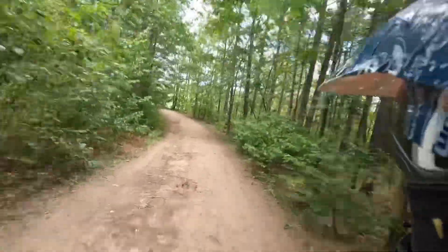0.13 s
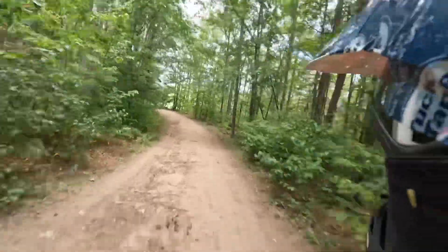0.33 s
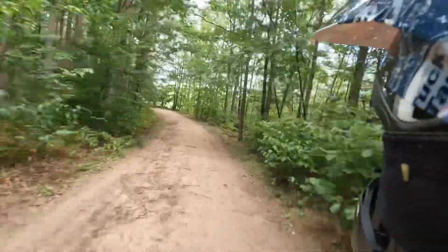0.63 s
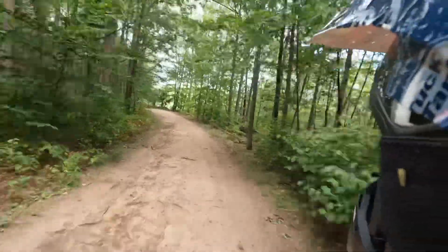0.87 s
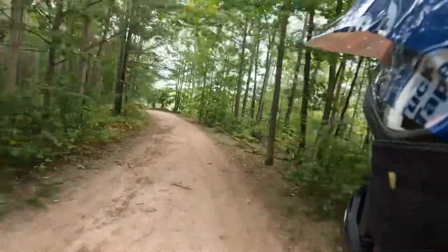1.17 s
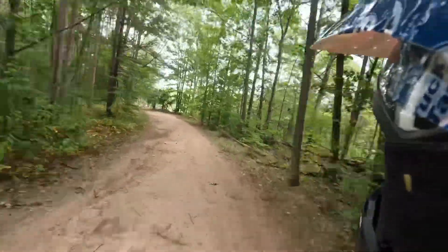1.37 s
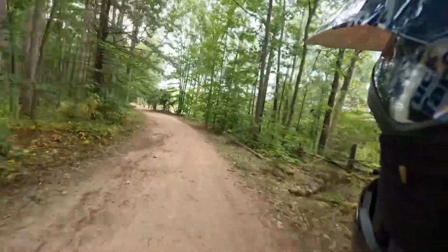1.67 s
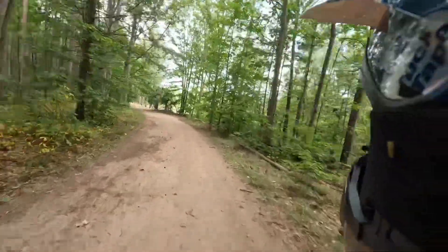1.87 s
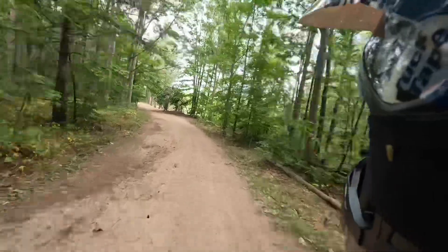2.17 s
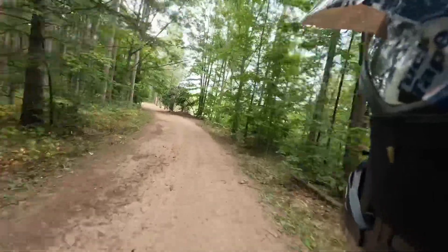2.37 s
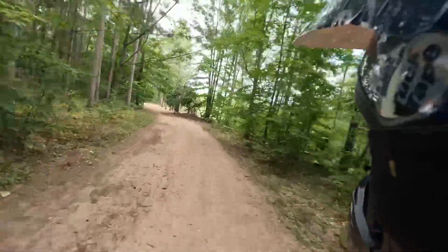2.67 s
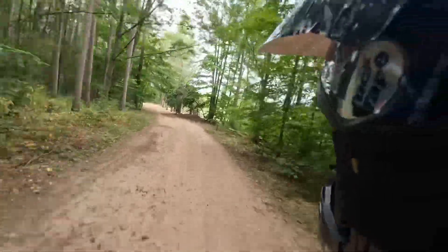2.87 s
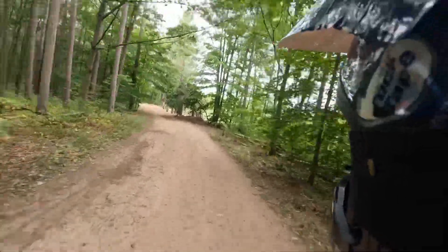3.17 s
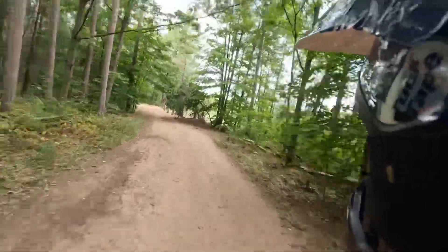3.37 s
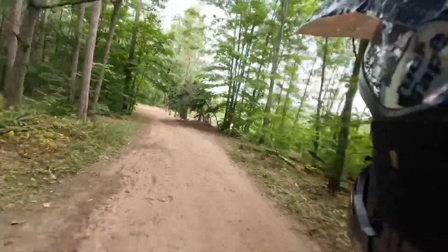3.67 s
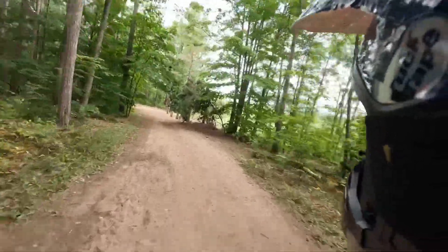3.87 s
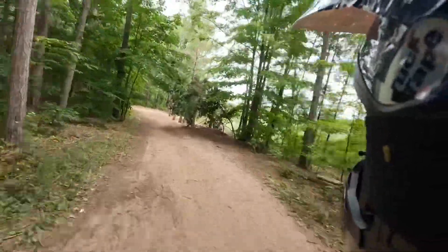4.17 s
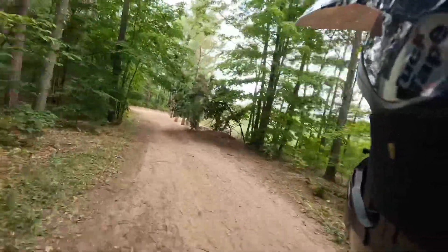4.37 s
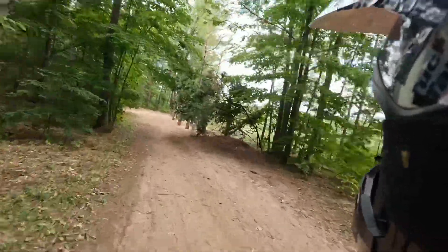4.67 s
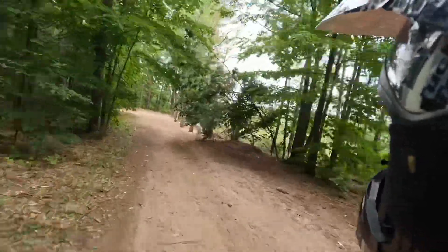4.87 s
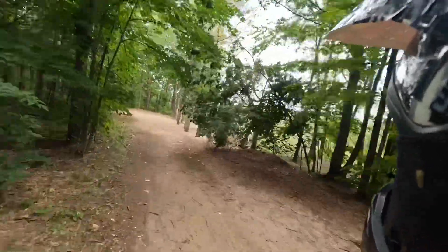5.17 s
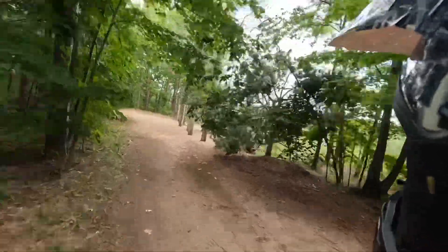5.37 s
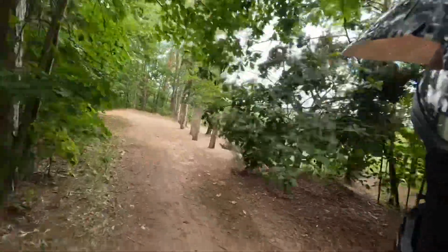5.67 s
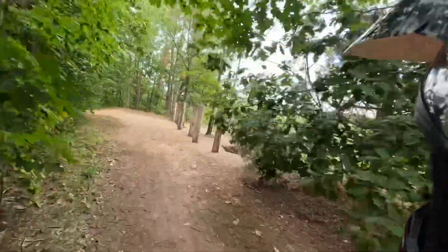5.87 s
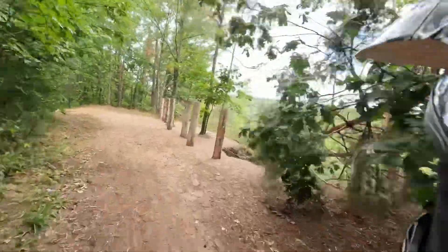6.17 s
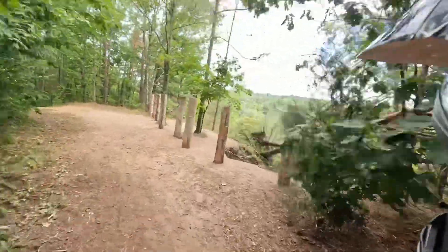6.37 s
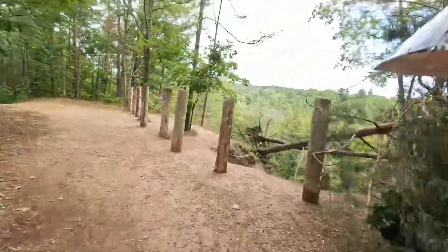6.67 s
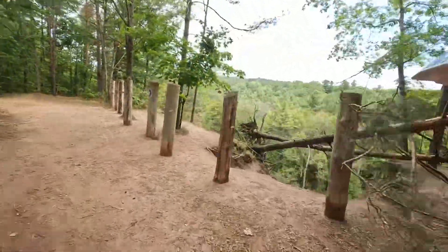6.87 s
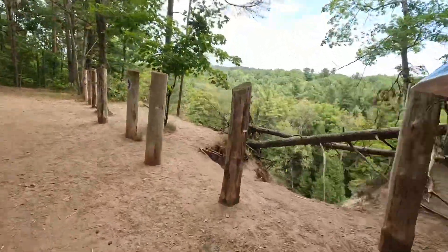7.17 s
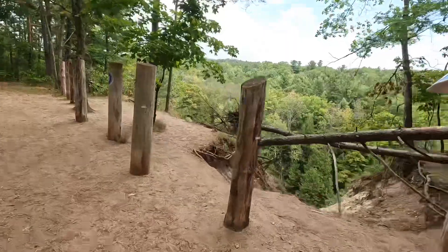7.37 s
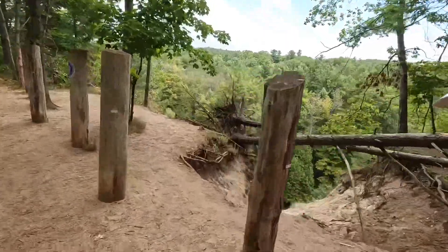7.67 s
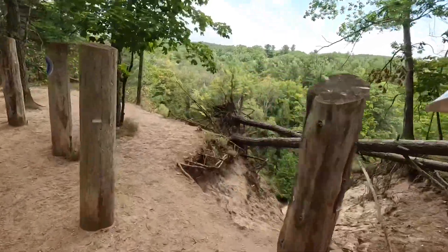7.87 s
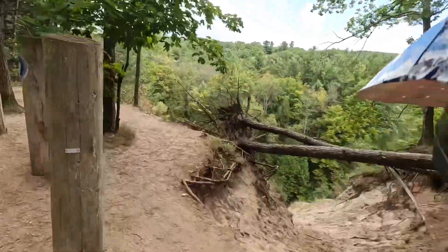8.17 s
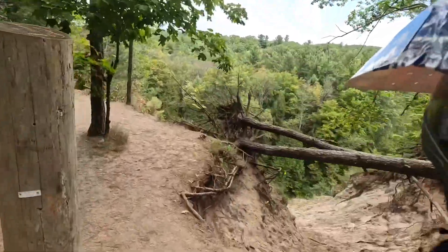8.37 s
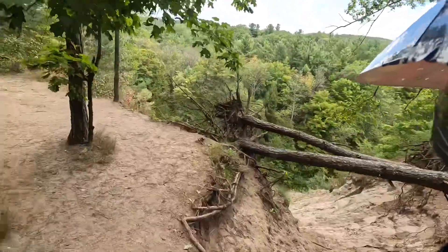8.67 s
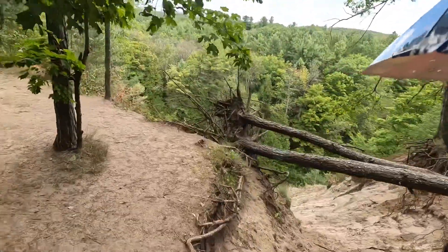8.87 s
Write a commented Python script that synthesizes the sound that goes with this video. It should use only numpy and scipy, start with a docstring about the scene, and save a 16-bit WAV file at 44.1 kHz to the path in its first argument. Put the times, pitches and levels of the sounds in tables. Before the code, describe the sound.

From the rider's shoulder, a little motorbike's buzzing engine slows from a brief rasp to a hollow, uneven putter, with metal clatter and tyre rumble.

```python
"""Dirt bike coasting to idle

A small two-stroke, heard from the rider's shoulder, shuts its throttle and coasts down a forest trail.
A crank clock with kicks and wander times the puffs that ring the silencer; strong firings add hollow pops
that end in a lumpy idle. Timed blows and shaped noise ring metal for clatter, slap and fizz.
Shaped noise also makes gear whine, chain hiss, tyre rumble and the air that buffets the microphone."""
import sys
import numpy as np
from scipy import signal
from scipy.io import wavfile
from scipy.ndimage import uniform_filter1d

SR = 44100
rng = np.random.default_rng(int(sys.argv[2]) if len(sys.argv) > 2 else 0)


def put_to_file(sound):
    """Save the sound as 16-bit audio at rate SR, in the file named by the first command-line argument."""
    columns = np.atleast_2d(sound).T  # one column per channel
    safe = np.clip(columns, -1, 1)
    whole_steps = np.round(safe * 32767)
    wavfile.write(sys.argv[1], SR, whole_steps.astype(np.int16))


N = 397782
T = np.arange(N) / SR

# mean crank speed, ahead of kicks and wander: t/s, speed/turns per second
MEAN_SPEED = [(0, 94.5), (.12, 87), (.26, 85.6), (.45, 78), (.66, 75.3), (.75, 76), (.92, 71.2),
              (1.06, 74.3), (1.19, 70.8), (1.28, 73.6), (1.37, 70.6), (1.46, 72.6), (1.64, 65.4),
              (1.86, 70.4), (1.99, 67), (2.17, 65.5), (2.38, 66.3), (2.48, 63.1), (2.58, 63.9),
              (2.78, 61.4), (2.9, 62.8), (3.02, 61.6), (3.17, 62.6), (3.38, 58.9), (3.75, 59.4), (3.95, 58),
              (4.15, 57.3), (4.3, 55.6), (4.55, 55.2), (4.9, 53), (5.12, 51.4), (5.36, 48.5), (6.2, 47.9),
              (6.6, 47.4), (7.25, 45.1), (7.9, 43.3), (8.15, 42.1), (8.5, 41.3), (8.85, 41.8), (9.02, 44)]
# bursts of strong firings: last pop t/s, its exhaust peak level/dB, firings in a row,
# metal knock level before smoothing/dB
BURSTS = [(1.415, -22, 1, -8), (3.63, -19, 1, -25), (3.834, -16.5, 1, 3), (3.953, -18, 1, -11),
          (4.094, -18, 1, -6), (4.233, -19.5, 1, 5.5), (4.362, -22, 1, -18), (4.502, -22, 1, -23),
          (4.661, -22, 2, -23), (4.791, -21.5, 1, -15), (4.904, -20.5, 1, -22), (5.056, -29, 2, -19),
          (5.233, -20, 1, -20), (5.398, -18, 1, 3), (5.563, -18, 1, -9), (5.583, -24.5, 1, 2),
          (5.769, -19.5, 2, -26), (5.914, -15.5, 1, 5), (6.1, -20, 3, -22), (6.286, -16.5, 1, -3),
          (6.451, -16.5, 1, 3), (6.58, -18.5, 1, -6), (6.643, -20.5, 2, -20), (6.792, -14.5, 1, 9),
          (6.94, -14.5, 1, 6), (7.093, -15, 1, 6), (7.241, -20, 4, -18), (7.33, -18.5, 1, -17),
          (7.374, -18.5, 1, -5), (7.421, -18, 1, -3), (7.487, -18.5, 2, -14), (7.601, -16.5, 1, -1),
          (7.736, -18, 1, -19), (7.827, -18.5, 1, -8), (7.897, -20.5, 2, -9), (8.011, -19, 1, -18),
          (8.082, -18.5, 1, -24), (8.153, -21.5, 1, -24), (8.246, -20.5, 1, -19), (8.342, -19.5, 1, -19),
          (8.461, -20, 2, -17), (8.58, -17.5, 1, -18), (8.653, -19.5, 2, -2), (8.7, -22, 1, -18),
          (8.867, -18, 1, 8.5), (8.912, -16, 1, 4)]
# weak exhaust puff of every turn, before scatter: t/s, level/dB
PUFF_LEVEL = [(0, -9.5), (.1, -22), (.14, -24), (.24, -25.5), (.35, -31.5), (.7, -36), (1, -33.5),
              (1.4, -31.5), (1.65, -30.5), (2, -23), (2.35, -27), (2.6, -25.5), (3.3, -27), (3.6, -24),
              (4.2, -26), (4.5, -30), (5.1, -26.5), (5.5, -29), (7, -25.5), (9.02, -28.5)]
# knocks in each turn: angle/share of a turn after the exhaust port opens, relative level/dB
KNOCK_ANGLES = [(.77, 0), (.97, -9), (.18, -9)]
# engine metal, before level trims: t/s, clatter level/dB, fizz level/dB
METAL_LEVEL = [(0, -34.5, -48), (.24, -40, -56), (.35, -46.5, -62.5), (.8, -47.5, -65), (1.2, -44, -59.5),
               (1.7, -45.5, -59.5), (2.5, -41, -58), (3, -44, -59), (4.15, -41.5, -54), (4.45, -45, -58),
               (5.2, -44, -59), (5.9, -43, -54.5), (7, -41, -55), (9.02, -42.5, -56.5)]
# rolling bike, before level trims: t/s, gear whine level/dB, chain hiss level/dB, tyre rumble level/dB
ROLLING_LEVEL = [(0, -57, -39, -28), (.3, -46, -43.5, -32.5), (.65, -47, -50, -32), (1.3, -53, -45, -30.5),
                 (2, -44.5, -43.5, -30.5), (2.8, -44, -45.5, -28.5), (3.4, -42, -44, -30),
                 (4.1, -35.5, -42.5, -33), (4.6, -41.5, -47.5, -36.5), (5.4, -38, -52.5, -37.5),
                 (5.9, -35.5, -48.5, -37), (6.2, -33.5, -52, -39), (6.7, -40, -54, -40.5),
                 (7.4, -43, -59, -41), (9.02, -46.5, -69, -41.5)]
# crank speeds where the silencer passes from idle to coasting, then from coasting to power:
# idle end, coasting start, coasting end, full power, all in turns per second
SILENCER_SPEEDS = [48.5, 51, 76, 87]

TRANSIT_S = 0.004525  # from the exhaust port opening to the pop leaving the pipe
IDLE_HZ = 45  # turns per second below which the engine fires as at idle


def gain_of(db):
    """Decibels to amplitude."""
    return 10 ** (np.asarray(db) / 20)


def evened(x):
    """Scales to rms 1."""
    return x / np.sqrt(np.mean(x ** 2) + 1e-20)


def curve(rows, order=1):
    """One column of a table of times, at every sample."""
    rows = np.asarray(rows)
    return np.interp(T, rows[:, 0], rows[:, order])


def smooth(x, length_s):
    """Running mean."""
    return uniform_filter1d(x, int(length_s * SR) + 1)


def fade(x, decay_s):
    """Gives every impulse an exponential tail."""
    return signal.lfilter([1], [1, -np.exp(-1 / (decay_s * SR))], x)


def swell(top_s, length_s):
    """Envelope that rises to 1 and dies again as a squared cosine."""
    return np.cos(np.pi * np.clip((T - top_s) / length_s, -.5, .5)) ** 2


def body(spectrum=None, modes=(), size=16384):
    """Minimum-phase impulse response from a broad spectrum and steep-sided resonances."""
    hz = np.fft.rfftfreq(size, 1 / SR)
    power = np.full(len(hz), 1e-10)
    if spectrum is not None:
        f, db = np.transpose(spectrum)
        level_db = np.interp(np.log(hz + 1), np.log(f + 1), db)
        power += gain_of(level_db) ** 2 / (1 + (hz / f[-1]) ** 2)
    for f, width, db in modes:
        power += gain_of(db) ** 2 / (1 + ((hz - f) / width) ** 2 * 2) ** 2
    log_gain = np.log(np.r_[power, power[-2:0:-1]]) / 2
    # the Hilbert transform of the log gain supplies the matching phase
    return np.fft.ifft(np.exp(np.conj(signal.hilbert(log_gain)))).real[:size // 2]


def ring(x, response):
    """Passes a signal through a body."""
    return signal.oaconvolve(x, response)[:N]


def hiss(response):
    """Steady noise of rms 1 in the colour of a body."""
    noise = rng.standard_normal(N + len(response) - 1)
    return evened(signal.oaconvolve(noise, response, "valid"))


def clicks(at, sizes):
    """Impulses at the given sample numbers."""
    return np.bincount(np.clip(at, 0, N - 1).astype(int), sizes, N)


def crossings(turns):
    """Samples at which a new turn begins."""
    return np.flatnonzero(np.diff(np.floor(turns)) > 0)


def strokes(turns, angle, decay_s, scatter_db):
    """Envelope of a blow that falls once a turn at one crank angle."""
    at = crossings(turns - angle)
    sizes = gain_of(scatter_db * rng.standard_normal(len(at)))
    return fade(clicks(at, sizes), decay_s)


def throttle():
    """How far the engine is under power, 0-1, judged by its mean speed."""
    return np.interp(curve(MEAN_SPEED), SILENCER_SPEEDS[2:], [0, 1])


def jolts(decay_s, lead_s=0.0056, rise_s=0.0069):
    """Envelope of hard combustion knocking the metal, just before each pop leaves the pipe."""
    s, _, _, db = np.transpose(BURSTS)
    return smooth(fade(clicks((s - lead_s) * SR, gain_of(db)), decay_s), rise_s)


def crank():
    """Turns of the crank: bursts kick it faster, and each ends on a whole turn as the exhaust port opens."""
    # kick size at idle speed and full charge, in turns per second before smoothing
    kick_hz, kick_sag_s, kick_lead_s = 10.5, .3, .006
    kick_rise_s, settle_s = .045, .5
    charge_s = .15  # a gap this long between bursts leaves a full fresh charge
    grip = 6  # the clutch and the bike's weight damp the kicks by this power of the speed
    wander_hz, wander_s = .25, .06  # rms chance speed change in turns per second, and its smoothing
    times, mean = np.transpose(BURSTS)[0] - TRANSIT_S, curve(MEAN_SPEED)
    charge = np.minimum(np.diff(times, prepend=0) / charge_s, 1)
    inertia = (np.interp(times, T, mean) / IDLE_HZ) ** grip
    blows = clicks((times - kick_lead_s) * SR, kick_hz * charge ** 2 / inertia)
    kicks = fade(blows, kick_sag_s)
    kicks = smooth(kicks, kick_rise_s) - smooth(kicks, settle_s)
    drift = smooth(smooth(rng.standard_normal(N), wander_s), wander_s)
    turns = np.cumsum(mean + kicks + wander_hz * evened(drift)) / SR
    # slide the phase gently so that each burst meets a whole turn
    lead = np.unwrap(-np.interp(times, T, turns) % 1, period=1)
    return turns + np.interp(T, times, lead)


def muffled(response, order=8, cutoff_hz=410, chamber_hz=350, chamber_width_hz=140):
    """The silencer cuts off steeply and an all-pass holds back notes near 350 Hz; peak 1."""
    _, poles = signal.iirpeak(chamber_hz, chamber_hz / chamber_width_hz, SR)
    delayed = signal.lfilter(poles[::-1], poles, response)
    soft = signal.sosfilt(signal.butter(order, cutoff_hz, fs=SR, output="sos"), delayed)
    return soft / abs(soft).max()


def heated(x, response):
    """Rings the silencer on a clock that speeds up with the heat of the gas, so its resonances move."""
    # t/s, resonance shift/%
    heat_shift = [(0, -1.1), (1, 1.5), (2.2, -0.5), (3.3, 0.5), (3.7, 3), (4.1, 7), (4.7, 6.5), (5.2, 0.5),
                  (6.2, 2), (7, 2.6), (7.7, 2.5), (8.3, 0.2), (9.02, 3.5)]
    clock = np.cumsum(1 + curve(heat_shift) / 100)
    ticks = np.arange(clock[-1])
    warped = np.interp(ticks, clock, x)
    rung = signal.oaconvolve(warped, response)[:len(ticks)]
    return np.interp(clock, ticks, rung)


def exhaust(turns, scatter_db=.6, coast_rasp=.0012, power_rasp=.01):
    """One puff a turn rings the front pipe and the silencer, whose colour follows the engine speed."""
    # silencer resonances at idle, coasting fast and under power: f/Hz, width/Hz, relative level/dB
    idle_modes = [(195.1, 9.8, 3), (210.4, 24.6, -1), (264, 29, 4), (321, 29, -0.5), (351, 20.4, 3),
                  (380.4, 22, -1.5)]
    fast_modes = [(182.6, 27, 4.5), (248.6, 30, 0.5), (315, 62, -2), (356, 19, 2), (369, 23, 2.5)]
    open_modes = [(212.4, 29, 4.5), (275, 68, -1), (378, 54, -13), (448, 81, 3), (676, 33, 4.5),
                  (1048, 83, -1), (1290, 110, -14), (1630, 150, -26)]
    # resonances of the singing front pipe: f/Hz, width/Hz, relative level/dB
    header_modes = [(466, 18, 1.5), (694, 69, -11)]
    # front pipe share of each puff: speed/turns per second, share
    header_share = [(50, 0), (52, .05), (59, .05), (66, .17), (76, .14), (87, 0)]
    speed, power = curve(MEAN_SPEED), throttle()
    idle = np.interp(speed, SILENCER_SPEEDS[:2], [1, 0])
    at = crossings(turns)
    puff_db = curve(PUFF_LEVEL)[at] + scatter_db * rng.standard_normal(len(at))
    puffs = clicks(at, gain_of(puff_db))
    # turbulent gas trails each puff, most of all under power
    rasp = (coast_rasp + power_rasp * power) * fade(puffs, decay_s=.015)
    flow = puffs + rasp * rng.standard_normal(N)
    pipes = [muffled(body(modes=idle_modes)), body(modes=fast_modes), body(modes=open_modes)]
    shares = [idle, 1 - idle - power, power]
    silencer = sum(heated(flow * share, pipe / abs(pipe).max()) for share, pipe in zip(shares, pipes))
    header = body(modes=header_modes)
    header_flow = flow * np.interp(speed, *np.transpose(header_share))
    return silencer + ring(header_flow, header / abs(header).max())


def rattle(turns, steady=1.6, decay_s=0.011, scatter_db=2, jitter_s=.00007):
    """Piston and bearings knock at fixed crank angles: bare knocks, and the envelope of their rattle."""
    knocks = np.zeros(N)
    for angle, db in KNOCK_ANGLES:
        at = crossings(turns - angle)
        size, late = rng.standard_normal((len(at), 2)).T
        knocks += clicks(at + late * jitter_s * SR, gain_of(db + scatter_db * size))
    return knocks, evened(steady + fade(knocks, decay_s))


def clatter(knocks, shake, level_db=6, knock_share=0.38, soft_hz=1300, jolt=0.42, jolt_s=0.018):
    """Dull knocks and their rattle ring the crankcase, louder after hard combustion."""
    # broad colour of the metal: f/Hz, relative level per Hz/dB
    clatter_colour = [(200, -34.5), (480, -9.5), (750, -14), (1400, -4.5), (1750, -12.5), (2200, -13),
                      (2600, -15), (3800, -17.5), (4800, -34), (7000, -68)]
    # crankcase and cylinder resonances: f/Hz, width/Hz, relative level/dB
    casing_modes = [(651, 67, 3), (693, 81, -2), (823, 27, -2.5), (950, 59, -1), (1033, 38, 4.5),
                    (1190, 49, 0), (1251, 58, 1.5), (1560, 94, -5), (1648, 99, 0), (1840, 46, -6.5),
                    (1882, 32, -12), (1973, 53, -9)]
    casing = body(clatter_colour, casing_modes)
    dull = signal.sosfilt(signal.butter(2, soft_hz, fs=SR, output="sos"), knocks)
    rattling = evened(ring(shake * rng.standard_normal(N), casing))
    sound = evened(knock_share * evened(ring(dull, casing)) + rattling)
    return gain_of(curve(METAL_LEVEL) + level_db) * (1 + jolt * jolts(jolt_s)) * sound


def slap(turns, scatter_db=1.5):
    """The piston slaps the cylinder wall as it turns at the top: a short, bright tick."""
    # t/s, level/dB
    slap_level = [(0, -46), (.33, -71), (3.4, -64), (4.2, -65), (5, -61.5), (5.9, -54), (7, -57.5),
                  (8.1, -53.5), (9.02, -58.5)]
    # f/Hz, relative level per Hz/dB
    slap_colour = [(1200, -20.5), (2200, 6), (2800, 1), (3500, -2), (4400, -5.5), (5700, -9.5), (6800, -19),
                   (8000, -22), (11000, -36.5), (14000, -62)]
    # cylinder resonances: f/Hz, width/Hz, relative level/dB
    cylinder_modes = [(3970, 230, 3), (4140, 30, 5), (4420, 200, 5.5), (5650, 200, -2.5)]
    burst = smooth(strokes(turns, KNOCK_ANGLES[0][0], .006, scatter_db), .0015)
    tick = ring(burst * rng.standard_normal(N), body(slap_colour, cylinder_modes))
    return gain_of(curve(slap_level)) * evened(tick)


def fins(turns, level_db=-2, steady=1.0, ring_s=0.019, scatter_db=1.5,
         crack_db=-55.5, crack_s=0.035, power_db=-54):
    """The fins fizz as the piston turns at the top; hard combustion and an open throttle add a crack."""
    # colours of the fizz and the combustion crack: f/Hz, relative level per Hz/dB
    fizz_colour = [(1500, -12.5), (2500, -6.5), (4000, -2), (4950, -3), (5700, -8.5), (5950, -7),
                   (6500, -8), (7000, -15), (8000, -12), (9000, -13.5), (10400, -20.5), (11000, -38.5),
                   (14000, -68.5)]
    crack_colour = [(1500, -20), (3000, 7.5), (6000, -6.5), (10300, -17.5), (11300, -23), (14000, -42.5)]
    # ringing of the cooling fins: f/Hz, width/Hz, relative level/dB
    fin_modes = [(2670, 13, -6), (3037, 100, 8), (3790, 20, 4), (4820, 28, -1.5), (4397, 56, 5),
                 (5270, 130, 0.5), (5610, 140, 0.5), (6150, 66, -2.5), (6700, 45, -13.5), (7560, 130, -7.5)]
    shake = evened(steady + strokes(turns, KNOCK_ANGLES[0][0], ring_s, scatter_db))
    fizz_gain = gain_of(curve(METAL_LEVEL, order=2) + level_db)
    fizz = fizz_gain * shake * hiss(body(fizz_colour, fin_modes))
    crack_gain = gain_of(crack_db) * jolts(crack_s) + gain_of(power_db) * throttle() ** 3
    return fizz + crack_gain * hiss(body(crack_colour))


def drive_train(turns, shake, gear_db=-1, lash_turn=.14, lash_share=0.56, chain_db=1, chain_shake=0.82):
    """Gears whine in narrow resonances and take up play once a turn; the engine tugs the hissing chain."""
    # resonances of the gears and the sprocket: f/Hz, width/Hz, relative level/dB
    gear_modes = [(970, 43, -14), (1026, 12, -13.5), (1191.4, 23, -2.5), (1216, 125, -10)]
    sprocket_modes = [(1047, 33, 21)]
    # f/Hz, relative level per Hz/dB
    chain_colour = [(1500, -16), (2550, -27.5), (2950, 6), (3350, 8.5), (3650, 2.5), (4100, -33),
                    (6000, -40)]
    teeth = body(modes=gear_modes)
    lash = ring(strokes(turns, lash_turn, .0001, scatter_db=2), teeth)
    whine = evened(hiss(teeth) + lash_share * evened(lash))
    gears = gain_of(curve(ROLLING_LEVEL) + gear_db) * whine
    chain_gain = gain_of(curve(ROLLING_LEVEL, order=2) + chain_db)
    chain = chain_gain * hiss(body(chain_colour, sprocket_modes))
    return gears + chain * evened(1 + chain_shake * (shake - 1))


def rumble(wind_db=1, tyre_db=1, lumps=0.45, wind_top_hz=48):
    """Air buffets the microphone in gusts and knobbly tyres drum on the dirt, both as low noise."""
    # colours of wind and tyres: f/Hz, relative level per Hz/dB
    wind_colour = [(8, -8), (20, -3.5), (30, -1), (40, -10.5), (52, -25.5), (90, -43), (300, -91.5)]
    tyre_colour = [(35, -31.5), (65, 0.5), (100, -4), (160, -7), (260, -13), (450, -15.5), (700, -19),
                   (1200, -20), (3000, -62)]
    # steady air, before the level trim: t/s, level/dB
    air_level = [(0, -18), (.6, -39), (.78, -28), (1.1, -27), (2.3, -23), (3.8, -19.5), (5.2, -21.5),
                 (6.8, -23), (7.7, -23.5), (9.02, -25)]
    # swelling gusts, before the level trim: top t/s, length/s, level/dB
    gust_rows = [(0.01, 0.38, -19.5), (0.308, 0.41, -13.5), (0.578, 0.29, -13), (1.204, 0.74, -19.5),
                 (1.348, 0.2, -20.5), (1.832, .1, -21.5), (2.863, 0.21, -20), (4.31, 0.19, -18),
                 (4.75, 0.2, -21)]
    air = signal.hilbert(hiss(body(wind_colour)))
    air = evened(air.real / np.sqrt(abs(air) ** 2 + lumps))  # eddies of much the same size
    gusts = sum(gain_of(db) * swell(top_s, length_s) for top_s, length_s, db in gust_rows)
    force = gain_of(wind_db) * (gain_of(curve(air_level)) + gusts)
    low_pass = signal.butter(2, wind_top_hz, fs=SR, output="sos")
    wind = signal.sosfiltfilt(low_pass, force * air)
    return wind + gain_of(curve(ROLLING_LEVEL, order=3) + tyre_db) * hiss(body(tyre_colour))


def throb(turns, lag=0.39):
    """The gas flow of each turn is a deep, pure wave at the crank rate; lag is a share of a turn."""
    # t/s, rms level/dB
    throb_level = [(0, -59), (1.35, -36.5), (1.65, -31), (3.3, -34), (4, -40.5), (6, -34), (6.9, -26.5),
                   (7.8, -19), (9.02, -19)]
    return -np.sqrt(2) * gain_of(curve(throb_level)) * np.cos(2 * np.pi * (turns - lag))


def firings(turns, scatter_db=3.0):
    """Which turns fire: the sample at which each turn begins, and its exhaust peak (0 for a miss)."""
    build_db = -0.5  # change from each firing in a burst to the next
    lead_in_db = 4.5  # while coasting, half-firings before a burst grow by this much a turn
    catch_db = -22  # at idle every second turn between bursts catches weakly, around this peak
    at = crossings(turns)
    speed = curve(MEAN_SPEED)
    peak, free = np.zeros(len(at)), 0
    catch = gain_of(catch_db + scatter_db * rng.standard_normal(len(at)))
    for s, db, count, _ in BURSTS:
        last = np.argmin(abs(at / SR - s + TRANSIT_S))
        before = np.arange(round(count))
        first = last - before[-1]
        gap = np.arange(free, first)
        if speed[at[last]] < IDLE_HZ:
            peak[gap] = catch[gap] * ((first - gap) % 2 == 0)
        else:
            peak[gap] = gain_of(db - build_db * before[-1] - lead_in_db * (first - gap))
        peak[last - before] = gain_of(db - build_db * before)
        free = last + 2  # no lead-in or weak catch on the turn after a burst
    return at, peak


def pops(fired):
    """A turn that really fires swells its weak puff into a hollow pop."""
    # hollow ring of a pop: f/Hz, width/Hz, relative level/dB
    pop_modes = [(195, 15, -15.5), (280, 14, 8), (318, 87, 7.5), (352.2, 30.6, 15.5), (377, 12, 4)]
    at, peak = fired
    extra = np.maximum(peak - gain_of(curve(PUFF_LEVEL)[at]), 0)
    return heated(clicks(at, extra), muffled(body(modes=pop_modes)))


def booms(push_db=-43, push_s=.015, boom_top_s=4.21, boom_length_s=0.75, boom_db=-37):
    """Hard combustion gives a low push of noise; a hollow boom swells once and dies as the bike slows."""
    # f/Hz, relative level per Hz/dB
    push_colour = [(50, -22), (110, 0), (200, -2.5), (300, -16), (600, -22), (1200, -50)]
    push = gain_of(push_db) * jolts(push_s) * hiss(body(push_colour))
    hollow = hiss(body(modes=[(206, 20, 0)]))  # f/Hz, width/Hz, relative level/dB
    return push + gain_of(boom_db) * swell(boom_top_s, boom_length_s) * hollow


def forest(x, wet_db=-18, t60=0.3):
    """Ground and tree trunks scatter a short, thin echo: sparse random taps that die away."""
    t = np.arange(SR // 2) / SR
    sparse = rng.random(len(t)) < 2000 / SR  # about 2000 reflections a second
    taps = rng.standard_normal(len(t)) * sparse * (t > .008) * gain_of(-60 * t / t60)
    return x + gain_of(wet_db) * ring(x, taps / np.linalg.norm(taps))


def scene():
    """The crank drives every part of the engine; throb, wind and tyres stay free of the echo."""
    turns = crank()
    knocks, shake = rattle(turns)
    bike = exhaust(turns) + clatter(knocks, shake) + slap(turns) + fins(turns)
    bike += drive_train(turns, shake) + pops(firings(turns)) + booms()
    return (forest(bike) + rumble() + throb(turns))[None]


def record(dry, edge_hz=14400):
    """A steep linear-phase low-pass limits the band."""
    padded = np.pad(dry, ((0, 0), (255, 255)), "edge")
    low_pass = signal.firwin(511, edge_hz, window=("kaiser", 9), fs=SR)
    return signal.oaconvolve(padded, low_pass[None], "valid")


dry = scene()
out = record(dry)
put_to_file(out)
```